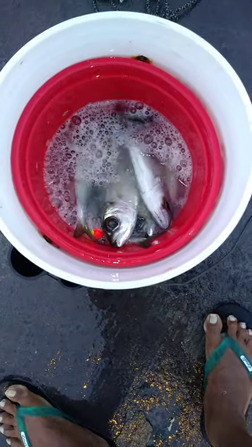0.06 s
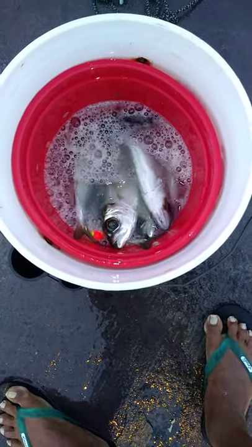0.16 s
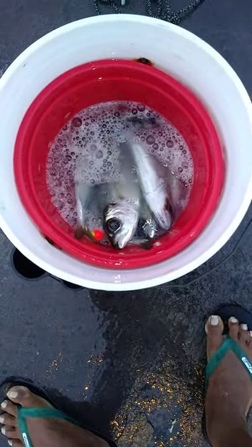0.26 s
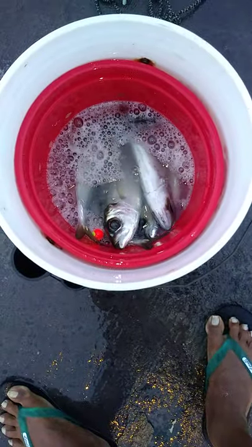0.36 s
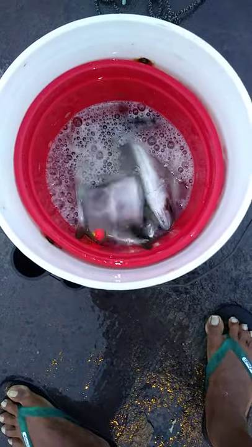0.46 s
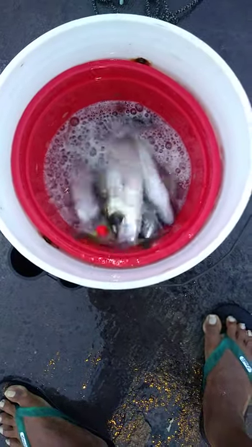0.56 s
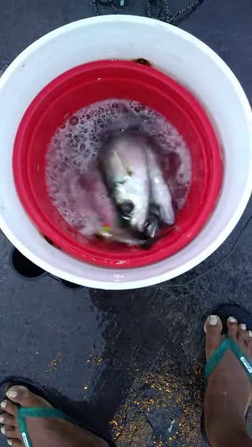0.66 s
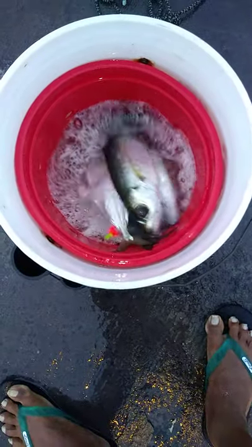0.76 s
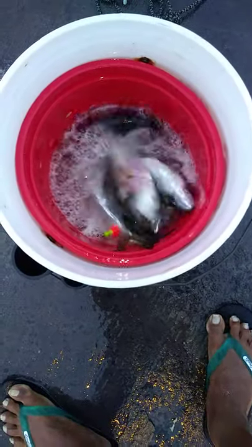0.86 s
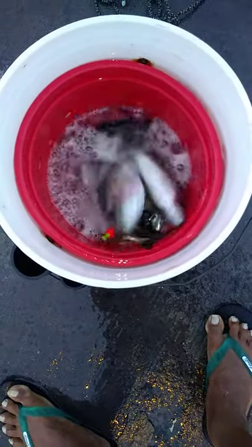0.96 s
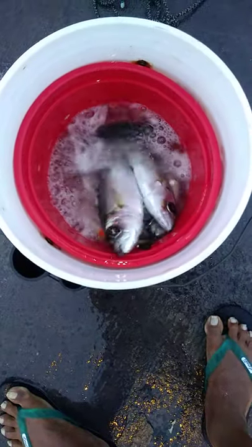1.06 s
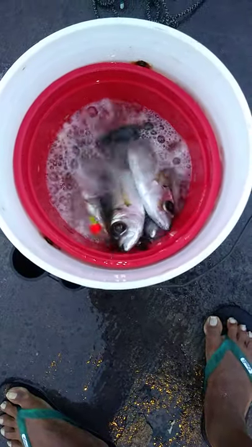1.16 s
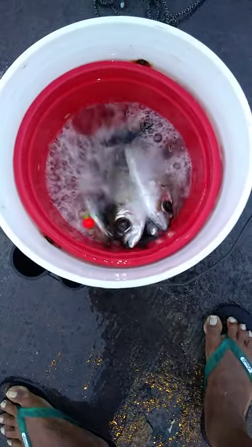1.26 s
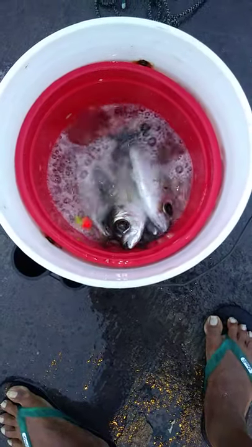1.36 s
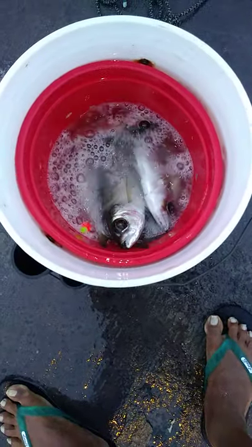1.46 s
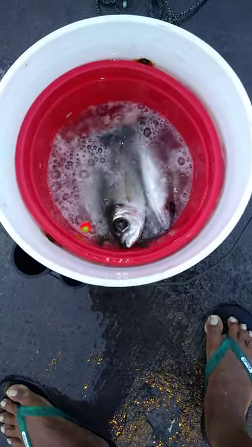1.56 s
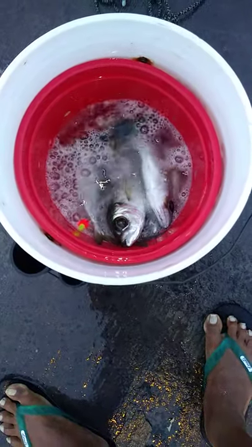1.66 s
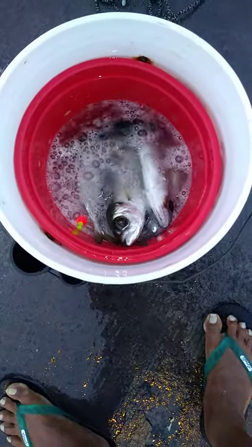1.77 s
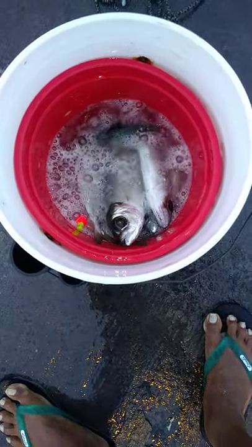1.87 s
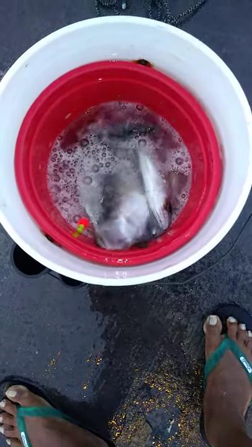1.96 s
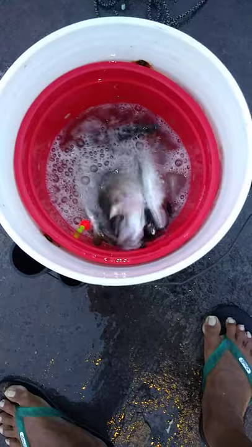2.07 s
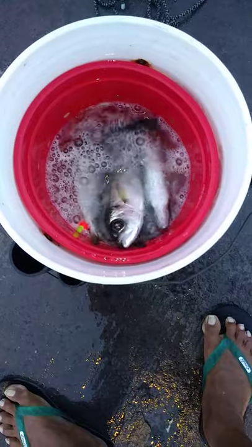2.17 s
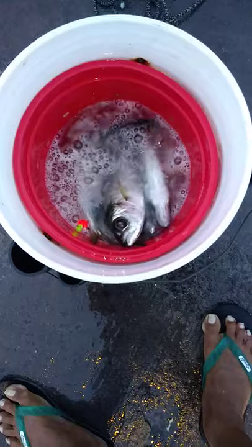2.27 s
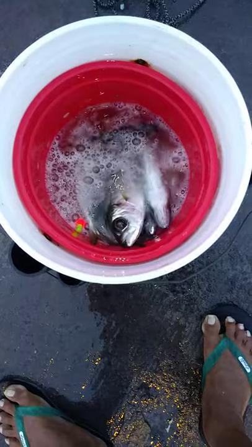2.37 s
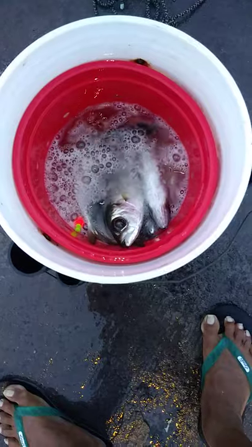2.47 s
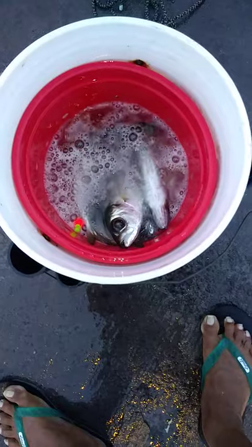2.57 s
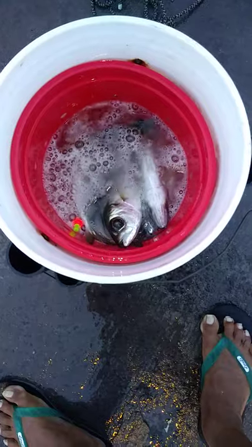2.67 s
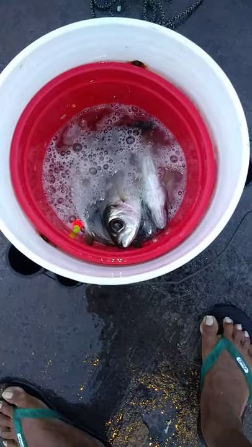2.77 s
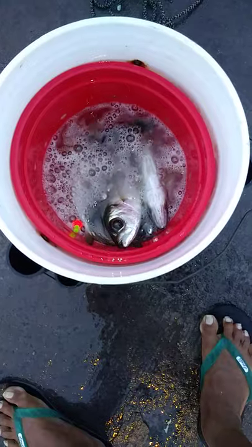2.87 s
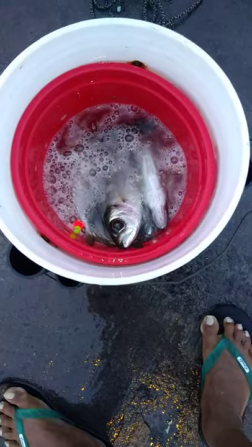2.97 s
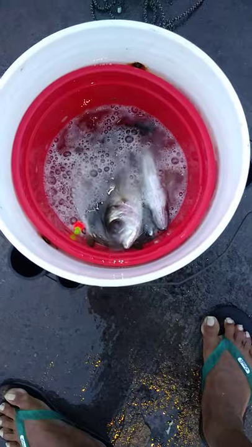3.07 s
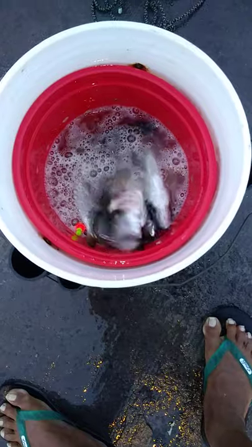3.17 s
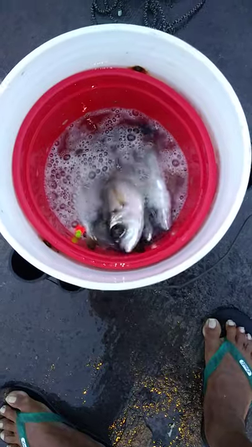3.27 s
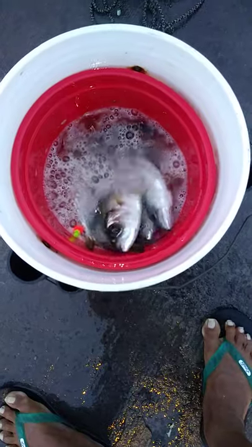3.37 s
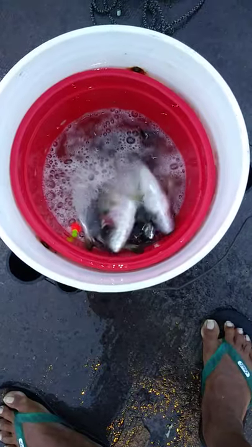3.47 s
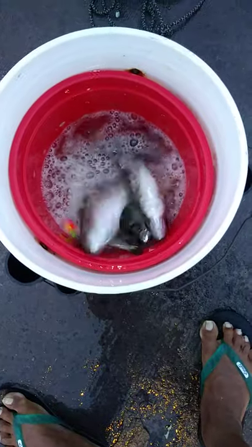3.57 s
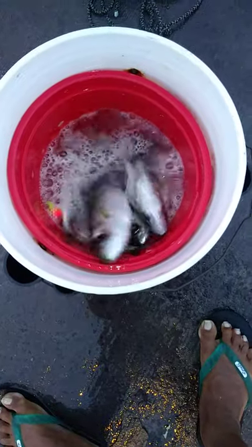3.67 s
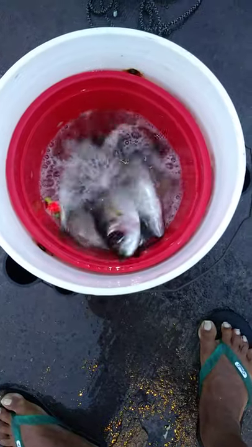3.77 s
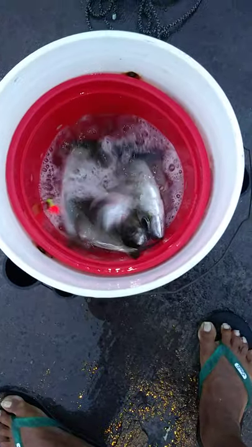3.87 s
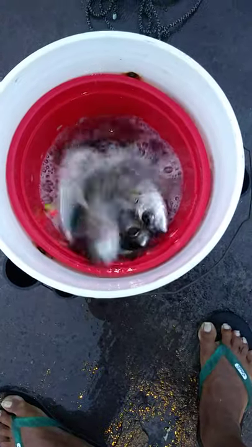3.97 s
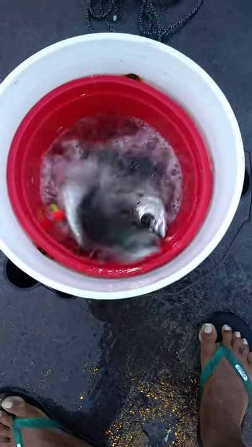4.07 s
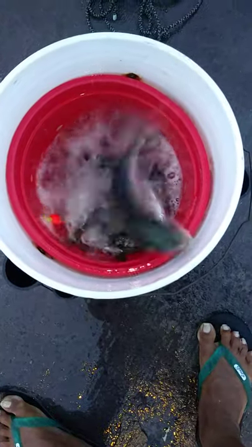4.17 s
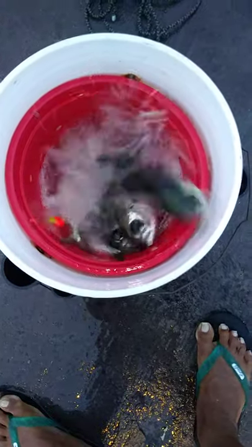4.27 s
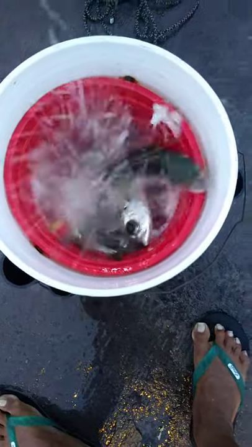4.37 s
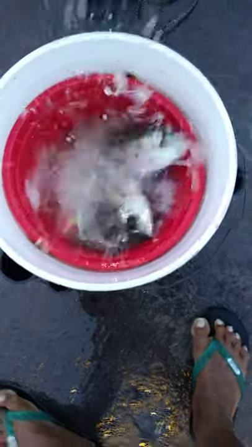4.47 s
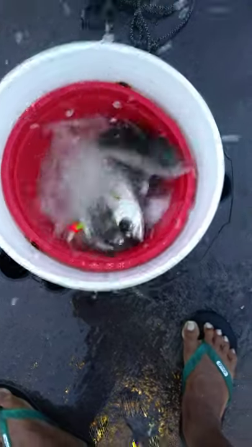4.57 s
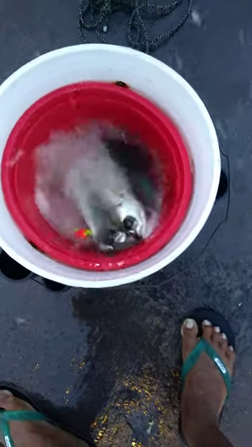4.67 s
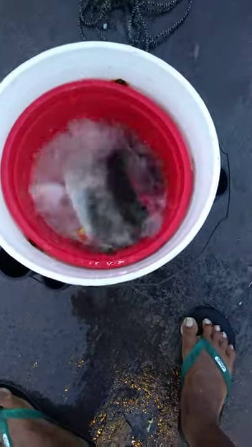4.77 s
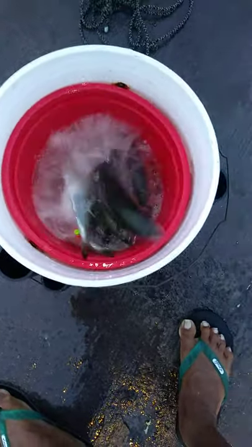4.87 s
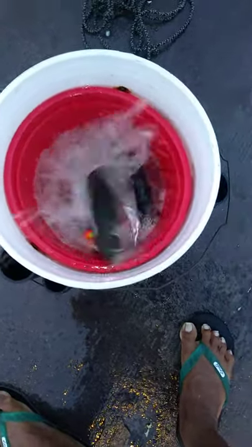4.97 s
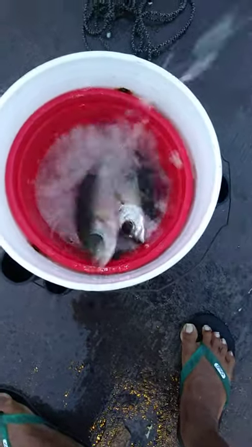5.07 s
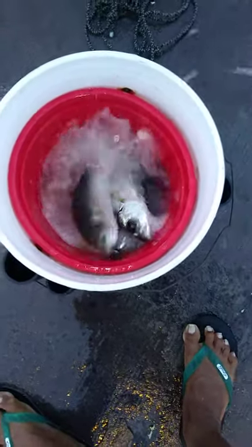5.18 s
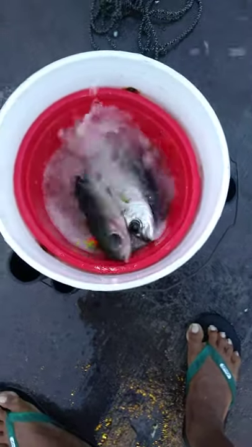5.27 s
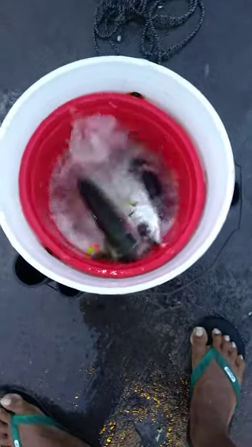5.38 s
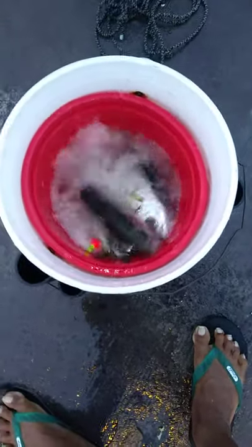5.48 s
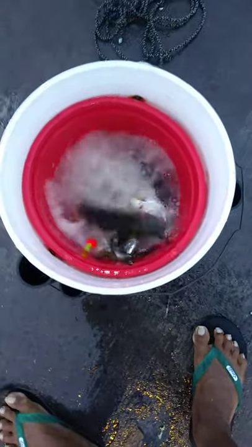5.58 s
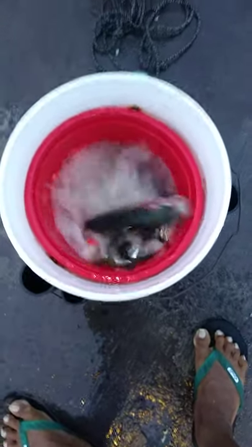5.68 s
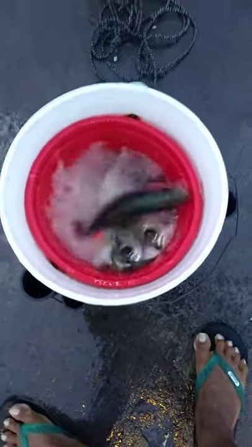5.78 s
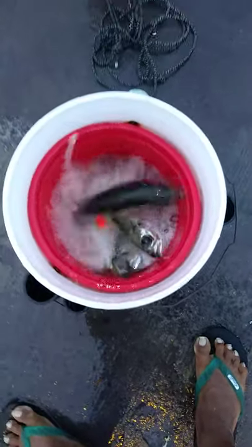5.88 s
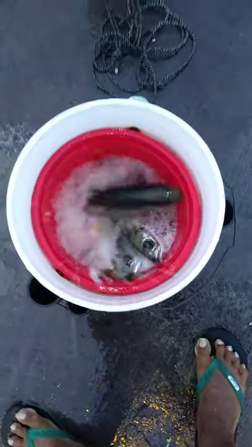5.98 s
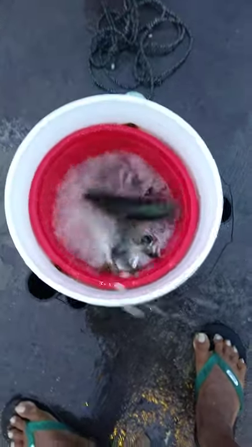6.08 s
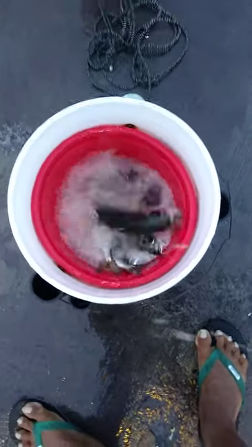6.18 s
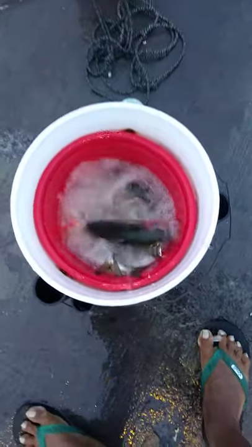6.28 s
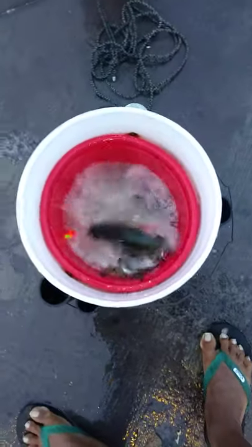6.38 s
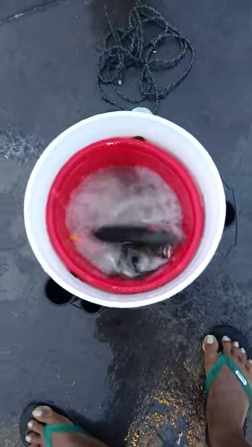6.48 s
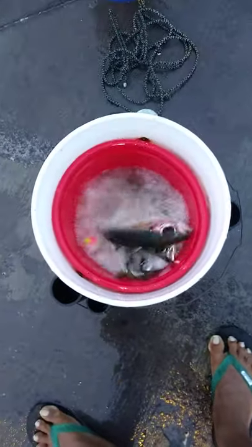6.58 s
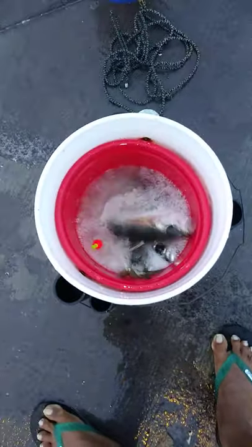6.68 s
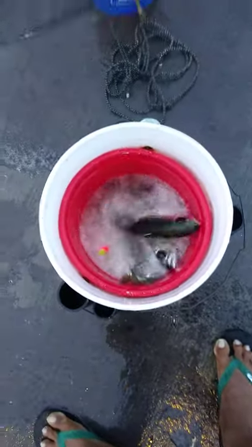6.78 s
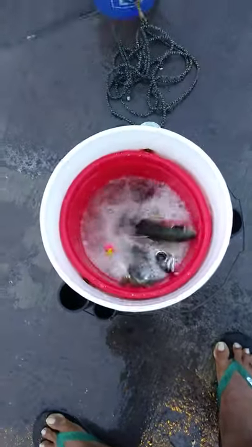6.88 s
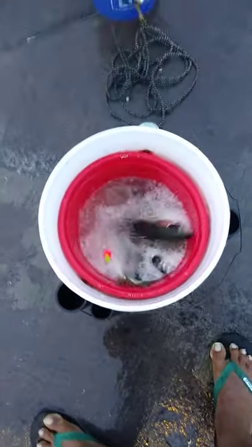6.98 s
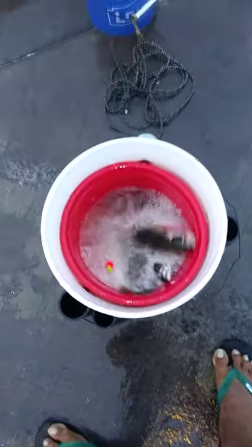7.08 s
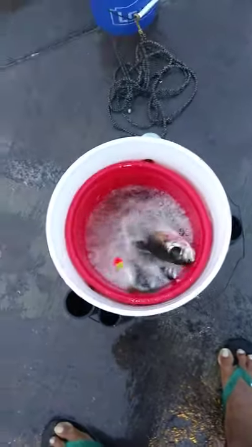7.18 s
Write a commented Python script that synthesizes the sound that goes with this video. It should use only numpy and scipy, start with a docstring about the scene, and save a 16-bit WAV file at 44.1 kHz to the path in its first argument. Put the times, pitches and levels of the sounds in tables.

```python
"""Fish flapping in a bucket.

Outdoors, a phone microphone above a plastic bucket of foamy water. Tails slap the surface and trap
bubbles, bodies thump the bucket so that its air booms, and the churned water fizzes, gurgles and pops.
Scattered flaps turn to thrashing at about 4 s. A distant wash and a little wind lie under it all."""
import sys
import numpy as np
from scipy import signal
from scipy.fft import rfft, irfft, next_fast_len
from scipy.io import wavfile
from scipy.ndimage import uniform_filter1d

SR = 44100
rng = np.random.default_rng(int(sys.argv[2]) if len(sys.argv) > 2 else 0)


def generate_wav(sig):
    """Save sig (samples, or channels by samples) to the path in sys.argv[1] as 16-bit PCM at SR."""
    pcm = np.round(np.clip(np.atleast_2d(sig).T, -1, 1) * 32767).astype(np.int16)
    wavfile.write(sys.argv[1], SR, pcm)


N = 319269


def gain_of(db):
    return 10 ** (np.asarray(db) / 20)


def unit_rms(x):
    return x / np.sqrt(np.mean(x ** 2) + 1e-20)


def add(mix, start_s, sound):
    part = mix[round(start_s * SR):][:len(sound)]
    part += sound[:len(part)]


def gain_curves(table):
    """One gain curve for each level column of a (time [s], level [dB], ...) table."""
    times, *columns = np.transpose(table)
    return gain_of([np.interp(np.arange(N) / SR, times, db) for db in columns])


def coloured(x, spectrum, lo_hz=0, hi_hz=SR):
    """Shapes x with a spectrum between two soft band edges, at rms 1."""
    size = next_fast_len(len(x), True)
    hz = np.fft.rfftfreq(size, 1 / SR) + 1
    points_hz, points_db = np.transpose(spectrum)
    curve = gain_of(np.interp(np.log(hz), np.log(points_hz), points_db))
    edges = 1 / (1 + (lo_hz / hz) ** 8) / (1 + (hz / hi_hz) ** 8)
    return unit_rms(irfft(rfft(x, size) * curve * edges, size)[:len(x)])


def resonate(x, hz, width_hz):
    """Two-pole resonance, at rms 1."""
    r = np.exp(-np.pi * width_hz / SR)
    return unit_rms(signal.lfilter([1, 0, -1], [1, -2 * r * np.cos(2 * np.pi * hz / SR), r * r], x))


def steep_resonance(x, hz, width_hz):
    return resonate(resonate(x, hz, width_hz), hz, width_hz)


def burst(t, rise, t60):
    """Quick rise and exponential fall, peak 1."""
    shape = (1 - np.exp(-(t / rise) ** 2)) * gain_of(-60 * t / t60)
    return shape / shape.max()


def swell(t, rise, fall):
    """Rounded peak of 1 at t = 0: 5 dB down `rise` s before it, dying by about 5 dB per `fall` s."""
    return gain_of(-5 * np.where(t < 0, (t / rise) ** 2, np.hypot(t / fall, .3) - .3))


def lumps(n, width, depth_db):
    """A gain that wavers at random, in lumps `width` samples wide."""
    drift = uniform_filter1d(rng.standard_normal(n), int(width), mode="wrap")
    return gain_of(depth_db * unit_rms(drift))


def bubbles(per_s, lo_hz, hi_hz, cycles, spread_db, pitches=11):
    """Random short rings that glide up a little as each bubble nears the surface."""
    out = np.zeros(N)
    for hz in np.geomspace(lo_hz, hi_hz, pitches):
        turns = np.arange(0, 4 * cycles, hz / SR)
        envelope = np.exp(-turns / cycles) * np.minimum(turns, 1)
        ring = np.sin(2 * np.pi * turns * (1 + .001 * turns)) * envelope
        strength = gain_of(spread_db * np.minimum(rng.exponential(1, N), 4))
        onsets = rng.random(N) < per_s / pitches / SR
        out += signal.oaconvolve(strength * onsets, ring / np.linalg.norm(ring))[:N]
    return out


def wind():
    """A faint low buffet of air on the microphone in the first half second."""
    t = np.arange(N) / SR
    rumble = resonate(rng.standard_normal(N), hz=157, width_hz=81) * lumps(N, 1200, 4.0)
    return gain_of(-50.5) * rumble * np.exp(-(t / 0.43) ** 6)


# Colour of the far background: (frequency [Hz], level [dB])
WASH_SPECTRUM = [(60, -48), (139, -14.5), (207, -1), (371, 1.5), (640, -10.5), (1280, -7), (1910, -15),
                 (2250, -10.5), (3120, -28.5), (4030, -23.5), (5600, -37.5), (6800, -33), (8000, -42.5),
                 (10300, -43), (16000, -44)]
# Its slow swell: (time [s], whole band level [dB], added middle band level [dB])
WASH_LEVELS = [(0, -38, -50), (.45, -39.5, -51.5), (1.4, -36, -83.5), (2.5, -38.5, -50), (3.9, -39.5, -52),
               (6.6, -37, -40), (7.24, -37, -39.5)]


def distant_wash():
    """Smooth outdoor noise from far off; its middle band grows towards the end."""
    whole_gain, middle_gain = gain_curves(WASH_LEVELS)
    whole = coloured(rng.standard_normal(N), WASH_SPECTRUM)
    middle = coloured(rng.standard_normal(N), WASH_SPECTRUM, 485, 1150)
    return lumps(N, 2700, 1.0) * (whole_gain * whole + middle_gain * middle)


# Colour of all splashing, heard from above the bucket: (frequency [Hz], level [dB])
SPLASH_SPECTRUM = [(290, -33), (500, -14), (595, -1.5), (795, 1), (1160, 0), (1770, -4.5), (2390, 3.5),
                   (5630, -8), (6610, -9.5), (7750, -20), (9920, -17.5), (13500, -29.5), (16000, -28)]
# Resonances of the air in the bucket: (frequency [Hz], width [Hz], level [dB])
AIR_MODES = [(312.6, 52, 2), (450, 67, -5.5)]
# Stirring of the water between slaps: (time [s], surface level [dB], depth level [dB])
CHURN_LEVELS = [(.42, -58, -48.5), (.6, -43, -43), (1.2, -51, -53), (1.4, -58, -65), (3.55, -55, -52),
                (3.95, -46.5, -49), (4.2, -22.5, -47), (4.55, -26.5, -29), (5.4, -30.5, -27.5),
                (5.485, -32.5, -33), (5.56, -27, -27.5), (5.9, -26, -31), (6.0, -31.5, -28.5),
                (6.2, -31.5, -30), (6.5, -34, -30), (6.64, -46, -43), (7.24, -50.5, -82)]


def churned_water():
    """The surface fizzes and ticks with drops; below, larger bubbles gurgle and the bucket's air booms."""
    surface, depth = gain_curves(CHURN_LEVELS)
    foam = unit_rms(bubbles(1100, 1500, 8000, cycles=7, spread_db=3.2, pitches=24))
    fizz = coloured(foam + .85 * rng.standard_normal(N), SPLASH_SPECTRUM, 620) * lumps(N, 397, 2.64)
    fine_drops = bubbles(600, 6400, 12600, cycles=3.5, spread_db=3.6, pitches=8)
    ticks = gain_of(-25.5) * coloured(fine_drops, SPLASH_SPECTRUM, 8700)
    large_bubbles = bubbles(400, 420, 1500, cycles=4, spread_db=3.8)
    gurgle = gain_of(-7) * coloured(large_bubbles, SPLASH_SPECTRUM, 470, 1250)
    boom = sum(gain_of(db) * steep_resonance(rng.standard_normal(N), hz, width_hz)
               for hz, width_hz, db in AIR_MODES)
    return surface * (fizz + ticks) + depth * (boom * lumps(N, 1300, 2.25) + gurgle)


# Single bubbles that stand clear of the foam: (time [s], level [dB], pitch [Hz])
BUBBLE_POPS = [(0.747, -14, 3340), (.835, -31, 4030), (1.079, -41, 8950), (1.182, -25, 3360),
               (1.252, -35, 9600), (1.414, -38, 10000), (1.514, -36, 9800), (1.854, -37, 3260),
               (2.085, -29.5, 3820), (2.129, -36, 5030), (1.7335, -22, 2580), (2.094, -28.5, 2600),
               (3.2, -33, 4800), (3.234, -31, 3150), (3.555, -45, 8200), (6.203, -6, 840),
               (6.204, -11, 2590), (6.477, -23, 6750), (6.508, -28, 5400), (6.603, -35, 10200),
               (6.776, -26, 4540)]


def bubble_pops():
    """Each bubble pops with a clean, short ring that glides up; large, low ones ring longer."""
    out, t = np.zeros(N), np.arange(1500) / SR
    for s, db, hz in BUBBLE_POPS:
        ring = np.sin(2 * np.pi * hz * t * (1 + 9.8 * t))
        add(out, s, gain_of(db) * ring * burst(t, rise=1.6 / hz, t60=0.0065 * (3600 / hz) ** 0.62))
    return out


# Bodies hitting the bucket: (peak time [s], level [dB], starting pitch [Hz], length [ms])
BODY_BLOWS = [(0.909, -19, 330, 8.8), (3.672, -26.5, 316, 26), (3.993, -22, 312, 7.7),
              (4.017, -18.5, 310, 44), (4.125, -13, 304, 6.5), (4.158, -16.5, 317, 30),
              (4.377, -21.5, 307, 22), (4.52, -9, 343, 8.9), (4.557, -14, 470, 7.9),
              (4.612, -4.5, 305, 6.1), (4.63, -8, 325, 5.9), (4.673, -2.5, 321, 10.4), (4.757, -14, 333, 7),
              (4.808, -9.5, 305, 8.7), (4.822, -12, 396, 8.3), (4.841, -15, 323, 11), (4.887, -13, 313, 26),
              (4.911, -3.5, 299, 9.1), (4.957, -13.5, 432, 12), (4.988, -13.5, 378, 9.9),
              (5.029, -5, 390, 6), (5.041, -5, 323, 6.6), (5.14, -6.5, 357, 8.6), (5.182, -10, 305, 6.6),
              (5.226, -14.5, 330, 18), (5.252, -16.5, 326, 5.9), (5.281, -18, 376, 10),
              (5.3, -10, 325, 6.7), (5.351, -12, 348, 7.2), (5.456, -16.5, 330, 10), (5.534, -6, 327, 15),
              (5.584, -15.5, 285, 6.7), (5.619, -13, 348, 8.1), (5.642, -10.5, 332, 15),
              (5.695, -15, 513, 6.5), (5.705, -9.5, 310, 8.6), (5.734, -10.5, 396, 6),
              (5.796, -12, 322, 11), (5.818, -19, 312, 10), (5.863, -13, 507, 4), (5.875, -10.5, 410, 4.3),
              (5.933, -12, 308, 8.4), (5.952, -9.5, 375, 5.6), (5.976, -7, 423, 3.6),
              (6.039, -11, 364, 7.7), (6.081, -9, 337, 6.7), (6.116, -14, 355, 11), (6.134, -8, 328, 8.2),
              (6.156, -19, 330, 6.2), (6.183, -13, 350, 7.9), (6.205, -22, 312, 11), (6.22, -10, 320, 12.6),
              (6.271, -16.5, 370, 4.8), (6.307, -12.5, 304, 7.1), (6.39, -13, 350, 4.2),
              (6.421, -15, 484, 3.7), (6.465, -15.5, 356, 3.7), (6.569, -21, 318, 7.8)]
LONGEST_RISE_S = 0.0067  # even a long blow or slap starts this fast


def body_thumps():
    """Each blow knocks hollowly and squeezes a pocket of air; the bucket's air rings on after it."""
    out, t = np.zeros(N), np.arange(-1024, 5000) / SR
    air_hz, air_width_hz, _ = AIR_MODES[0]
    settle_s, ring_on_share = 0.012, 0.064
    since_peak = np.maximum(t, 0)
    settled_time = since_peak - settle_s * (1 - np.exp(-since_peak / settle_s))
    for s, db, hz, ms in BODY_BLOWS:
        length = ms / 1000
        turns = hz * t + (air_hz - hz) * settled_time  # the pitch settles on that of the bucket's air
        boom = np.cos(2 * np.pi * turns) * swell(t, min(0.43 * length, LONGEST_RISE_S), 0.4 * length)
        knock_hz = hz * rng.uniform(1.3, 1.894)
        knock = gain_of(-14) * np.cos(2 * np.pi * knock_hz * t) * swell(t, 0.004, 0.004)
        add(out, s + t[0], gain_of(db) * (boom + knock))
    return out + ring_on_share * out.std() * resonate(out, air_hz, air_width_hz)


def trapped_bubbles(t, hz, length, wetness):
    """A slap's bubble rings, rising as it nears the surface; a second of chance pitch closes after it."""
    envelope = swell(t, 0.00053, min(3.6 / hz, 0.41 * length))
    first = np.sin(2 * np.pi * hz * t * (1 + 2.8 * t)) * envelope
    second_hz = 2116 * (4400 / 2116) ** rng.random()
    u = t - rng.random() * length
    second = np.sin(2 * np.pi * second_hz * u * (1 + 0.83 * u)) * swell(u, 0.0032, 4.5 / second_hz)
    return gain_of(-4) / wetness * first + gain_of(-12) * wetness * second


# Tails hitting the water below the microphone:
# (peak time [s], level [dB], bubble pitch [Hz], length [ms], spray relative to the slap [dB])
TAIL_SLAPS = [(0.483, -23, 1380, 7, -26), (0.493, -18.5, 1480, 3.5, -12.5), (0.52, -25.5, 2310, 18, -19),
              (0.543, -22, 4530, 4.8, -19), (0.564, -11.5, 1315, 11.2, -20.5), (0.569, -16, 2340, 3, -20.5),
              (0.588, -19.5, 1310, 12.6, -22), (0.624, -20.5, 3480, 9.4, -27),
              (0.698, -25.5, 2800, 4.4, -14), (0.881, -26.5, 1070, 11, -17.5), (0.901, -34, 2800, 5.7, -4),
              (0.934, -25.5, 2560, 2.4, -24), (0.962, -26.5, 1360, 15, -25), (1.066, -20.5, 837, 12.5, -24),
              (1.097, -11.5, 2600, 3, -12), (1.123, -19, 925, 5.3, -31), (1.15, -18, 2630, 3.2, -23),
              (1.732, -10, 2200, 5.8, -23.5), (2.02, -16, 1265, 8.12, -18), (2.0262, -12, 1380, 2.9, -23),
              (3.139, -25, 2460, 5.6, -19), (3.1497, -18, 1454, 9, -18.5), (3.634, -16, 1490, 9.1, -39),
              (3.661, -25, 780, 13, -24), (3.693, -22.5, 2460, 3.7, -23), (3.708, -19.5, 1053, 8.3, -36),
              (3.75, -26.5, 2850, 2.3, -36), (3.788, -18.5, 2310, 4.9, -28.5),
              (3.883, -24.5, 2520, 2.1, -15), (3.926, -22, 3980, 5.7, -36), (3.987, -15.5, 1450, 12, -24),
              (4.007, -12, 2750, 11, -18.5), (4.063, -17.5, 3400, 2.3, -22), (4.102, -7, 1470, 8.9, -27),
              (4.136, -10, 2400, 7.7, -21), (4.144, -8, 2570, 5.3, -35), (4.17, -8.5, 1440, 3.4, -37),
              (4.198, -3, 2550, 5.6, -15.5), (4.209, -15.5, 2420, 10.3, -5.5), (4.24, -7.5, 2230, 5.6, -14),
              (4.248, -8.5, 2350, 7.5, -12.5), (4.281, -8.5, 2550, 16, -11.5),
              (4.318, -5, 2730, 5.2, -13.5), (4.328, -12, 2530, 5.8, -6.5),
              (4.361, -3.5, 2580, 11.8, -17.5), (4.397, -8, 1150, 7.5, -16.5),
              (4.409, -13.5, 2330, 11, -19), (4.445, -7.5, 736, 5, -13.5), (4.454, -8.5, 2330, 9.1, -13),
              (4.478, -6.5, 943, 6.6, -20), (4.499, -12, 2460, 10, -17), (4.517, -11, 890, 12.7, -18),
              (4.555, -4.5, 2530, 7.7, -17.5), (4.598, -15, 1230, 15, -24), (4.623, -14.5, 2300, 15, -18.5),
              (4.665, -11.5, 2180, 7.5, -22), (4.737, -12.5, 2530, 16, -21),
              (4.749, -14.5, 2380, 2.7, -6.5), (4.777, -15.5, 837, 35, -23), (4.816, -7, 1124, 10.4, -18),
              (4.841, -13.5, 2600, 25, -16), (4.869, -15, 2400, 15, -33), (4.903, -12.5, 760, 12, -13.5),
              (4.944, -7.5, 2850, 8.1, -13.5), (4.984, -9, 2630, 10.5, -14), (5.016, -13, 2830, 5.9, -12.5),
              (5.064, -13.5, 810, 19, -17.5), (5.105, -8, 1470, 7.8, -28), (5.133, -19, 2630, 12, -9),
              (5.145, -13.5, 2650, 16, -22), (5.177, -14, 2450, 4.6, -27), (5.211, -11, 2780, 14.6, -14.5),
              (5.247, -6.5, 4360, 3.5, -12.5), (5.284, -11.5, 2900, 16, -24), (5.299, -13.5, 2880, 4, -16),
              (5.33, -8, 2440, 5, -30), (5.261, -10.5, 944, 6.9, -23), (5.372, -14.5, 3500, 13.6, -16),
              (5.411, -6, 2340, 3.4, -25), (5.437, -17, 2420, 18, -17), (5.509, -12.5, 2570, 5.6, -18.5),
              (5.531, -17.5, 1240, 6, -18), (5.54, -10.5, 2760, 4, -14.5), (5.581, -18, 2730, 18, -22),
              (5.62, -9.5, 2750, 2.9, -27), (5.649, -14.5, 2720, 2.5, -12), (5.693, -13.5, 710, 8.1, -18.5),
              (5.732, -19, 2850, 5.1, -23), (5.809, -11, 2900, 4.4, -23), (5.87, -10.5, 820, 3.6, -14.5),
              (5.899, -13, 2900, 8.9, -9.5), (5.946, -15, 905, 14, -17), (5.976, -8, 1880, 8.8, -21.5),
              (6.039, -15.5, 1110, 16, -17.5), (6.14, -14, 2170, 16, -16.5),
              (6.207, -15.5, 2570, 11.3, -18), (6.242, -13, 2620, 2.1, -19), (6.267, -16, 790, 3.4, -37),
              (6.292, -12.5, 2440, 3.3, -15), (6.357, -12.5, 880, 3, -28), (6.385, -11.5, 784, 9.9, -27),
              (6.427, -11.5, 2830, 13, -25), (6.468, -11.5, 920, 12.6, -29), (6.547, -19.5, 2520, 3.4, -26),
              (6.592, -26, 900, 11, -31), (6.765, -25, 3080, 3.4, -15), (6.81, -22.5, 2510, 4.3, -30)]
USUAL_SLAP_MS, THRASH_START_S = 8.1, 4.05


def tail_slaps():
    """A trapped bubble and its cloud ring at one pitch, over a wide spatter and a bright spray."""
    out, t = np.zeros(N), np.arange(-1024, 2560) / SR
    n, spray_edge_hz = len(t), 4500
    droplets = unit_rms(bubbles(2000, 700, 5000, cycles=5, spread_db=3.5, pitches=20))
    for s, db, hz, ms, spray_db in TAIL_SLAPS:
        start, length = s + t[0], ms / 1000
        cloud_noise, spatter_noise, spray_noise = rng.standard_normal((3, n))
        wetness = gain_of(np.log2(ms / USUAL_SLAP_MS))  # 1 dB more for each doubling of length
        rings = trapped_bubbles(t, hz, length, wetness)
        cloud = gain_of(-12.5) * steep_resonance(cloud_noise * lumps(n, 89, 1.6), hz, 0.29 * hz)
        drops = droplets[round(start * SR):][:n] + 0.97 * spatter_noise
        low_hz = (0.49 if s < THRASH_START_S else 0.26) * hz  # deeper once the fish thrash
        spatter = gain_of(-10) * wetness * coloured(drops, SPLASH_SPECTRUM, low_hz, spray_edge_hz)
        spray = coloured(spray_noise * lumps(n, 60, 3.0), SPLASH_SPECTRUM, spray_edge_hz)
        gobs = unit_rms(lumps(n, 90, 3.0))  # the water lands in gobs a few ms apart
        water = gobs * (cloud + spatter) + gain_of(spray_db) * spray
        envelope = swell(t, min(0.4 * length, LONGEST_RISE_S), 0.59 * length)
        add(out, start, gain_of(db) * (rings + water * envelope))
    return out


def scene():
    """The bucket and its surroundings, in mono from above the water."""
    bucket = tail_slaps() + body_thumps() + bubble_pops() + churned_water()
    return (bucket + distant_wash() + wind())[None]


def record(dry):
    """The phone microphone cuts the bass, clips the loudest peaks and passes nothing above 16 kHz or so."""
    thin = signal.sosfilt(signal.butter(2, 120, "high", fs=SR, output="sos"), dry)
    clipped = np.clip(thin, -.72, .68)
    band_limit = signal.firwin(511, 15900, window=("kaiser", 9), fs=SR)
    return signal.oaconvolve(clipped, band_limit[None], "same")


dry = scene()
out = record(dry)
generate_wav(out)
```